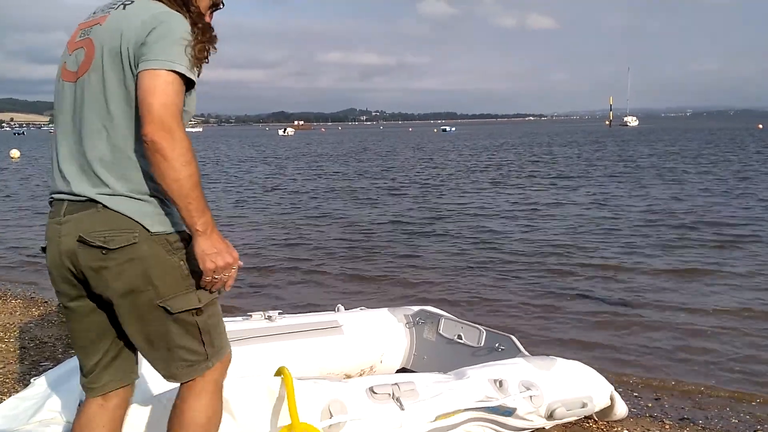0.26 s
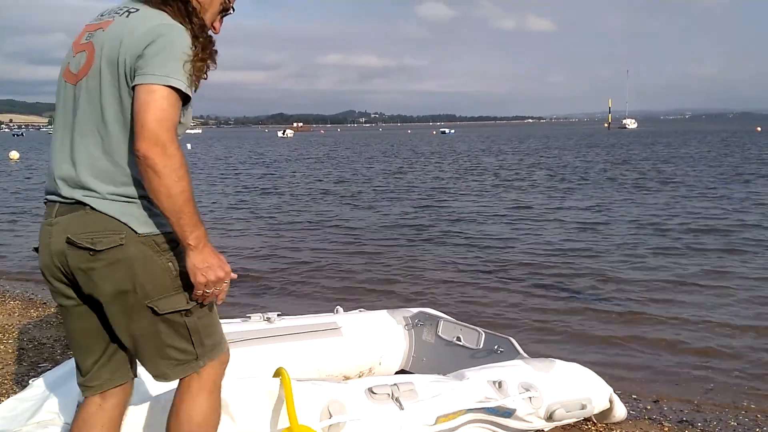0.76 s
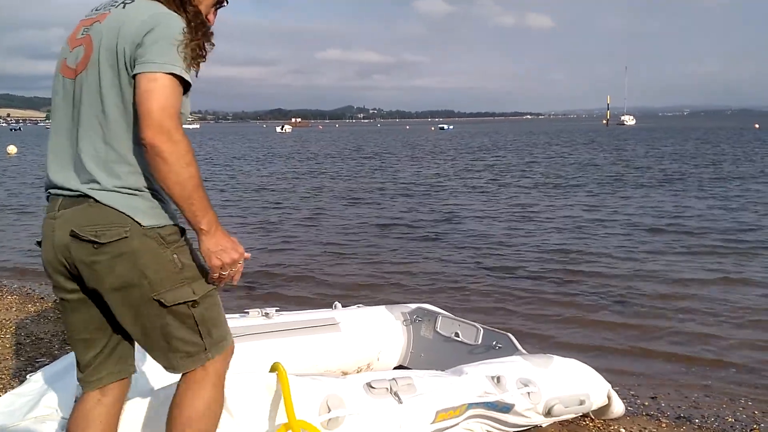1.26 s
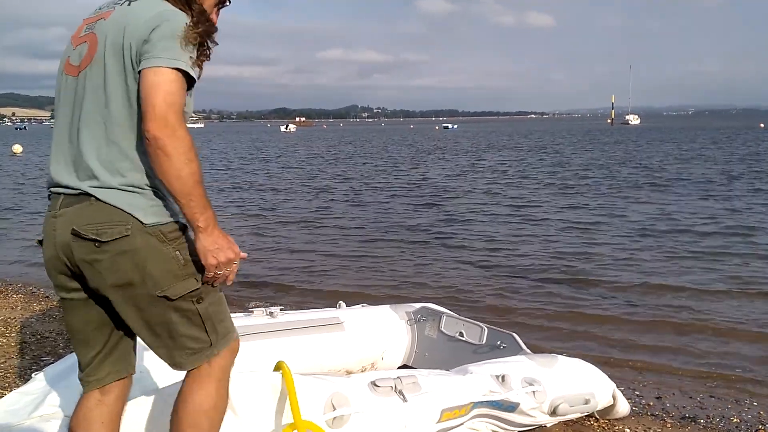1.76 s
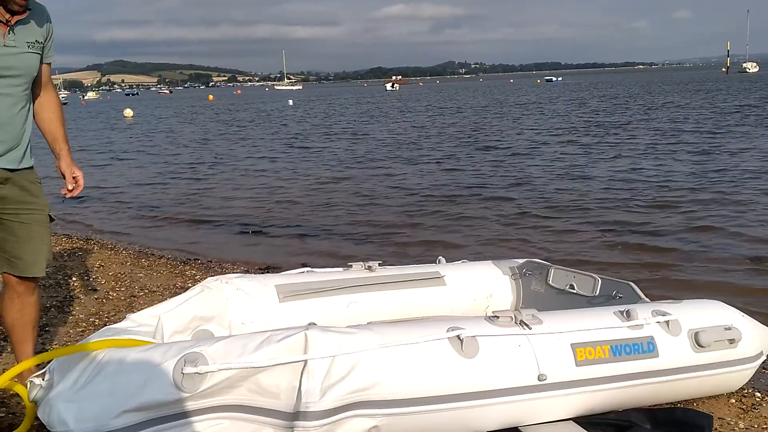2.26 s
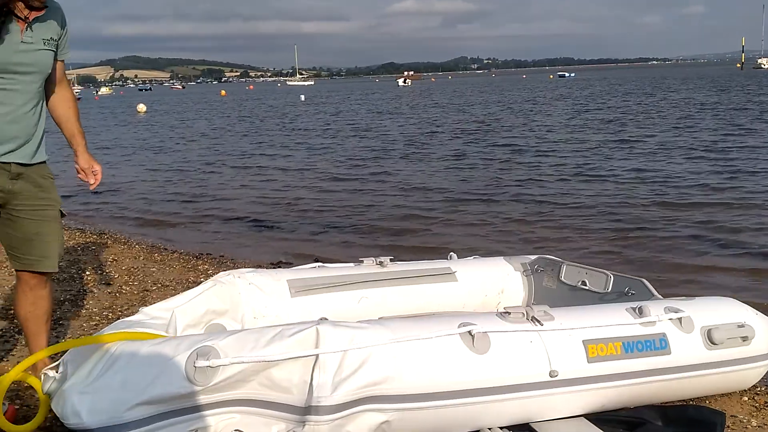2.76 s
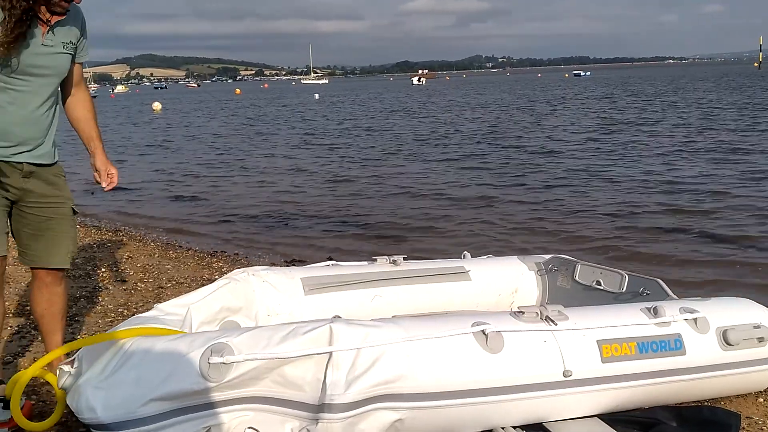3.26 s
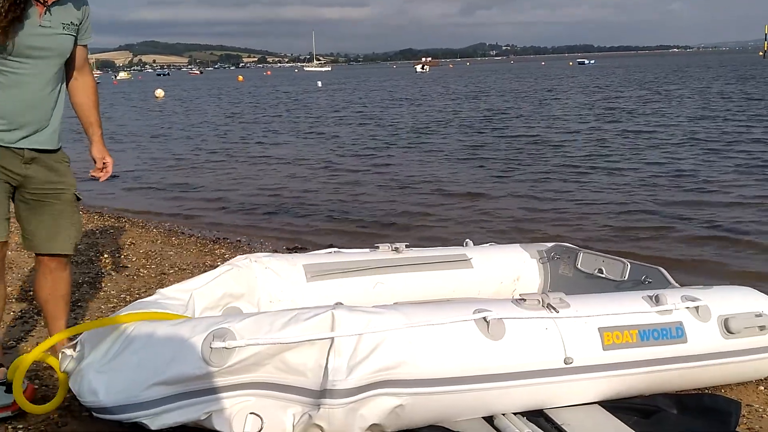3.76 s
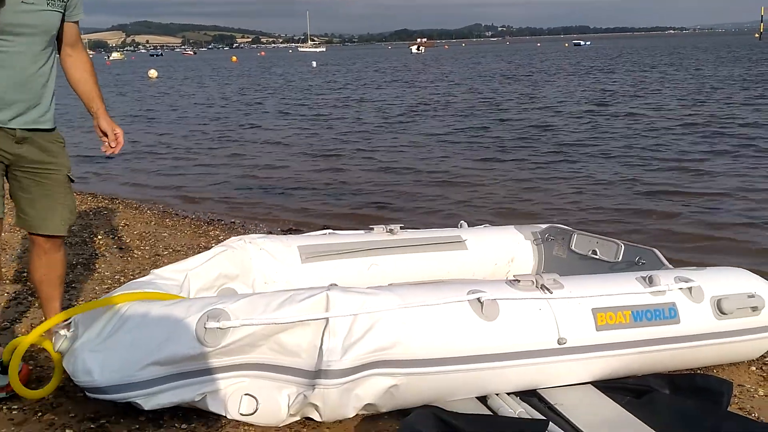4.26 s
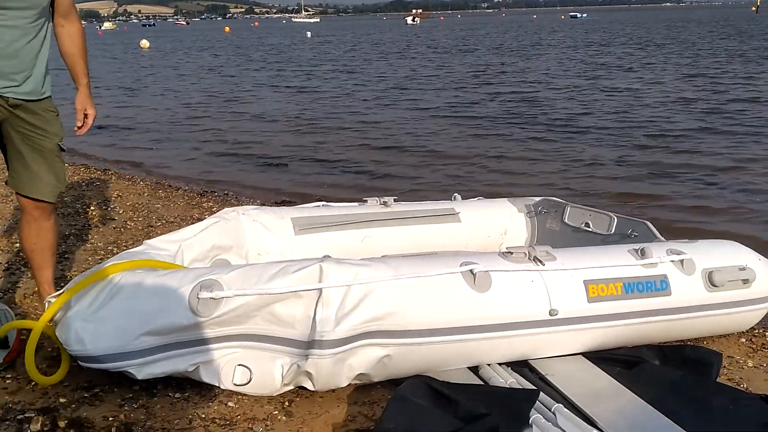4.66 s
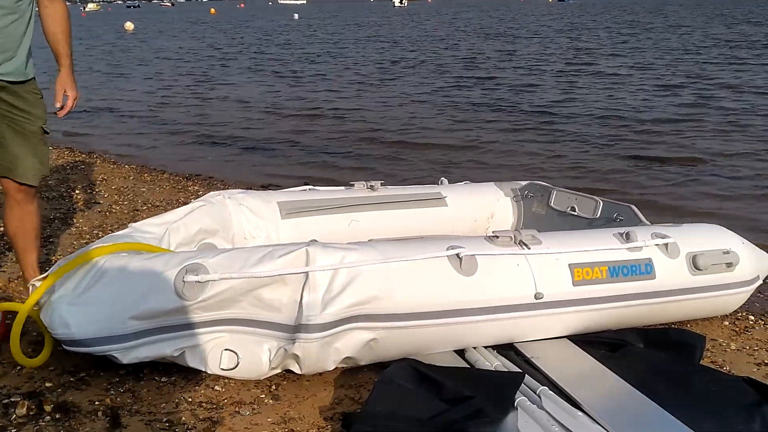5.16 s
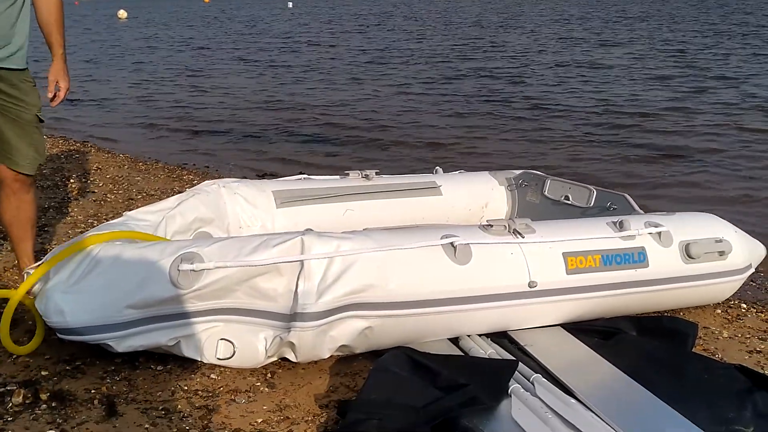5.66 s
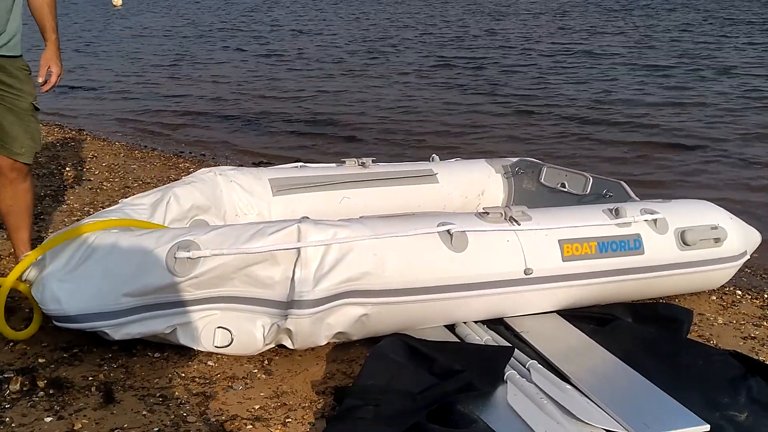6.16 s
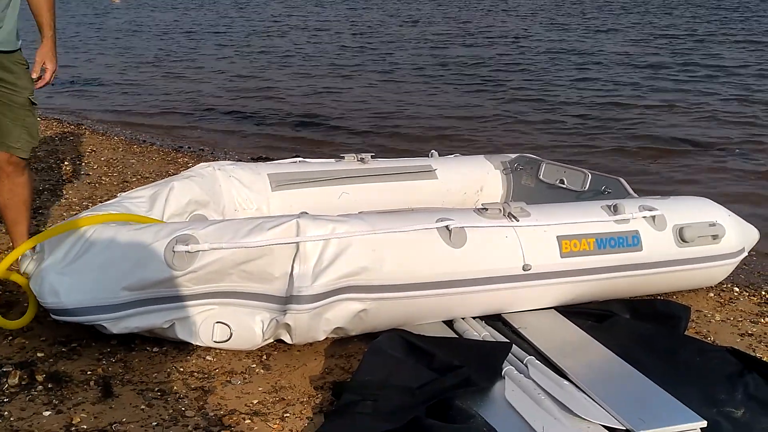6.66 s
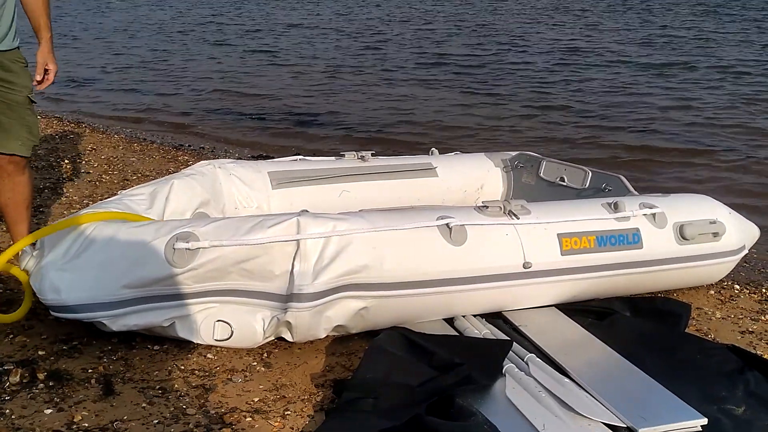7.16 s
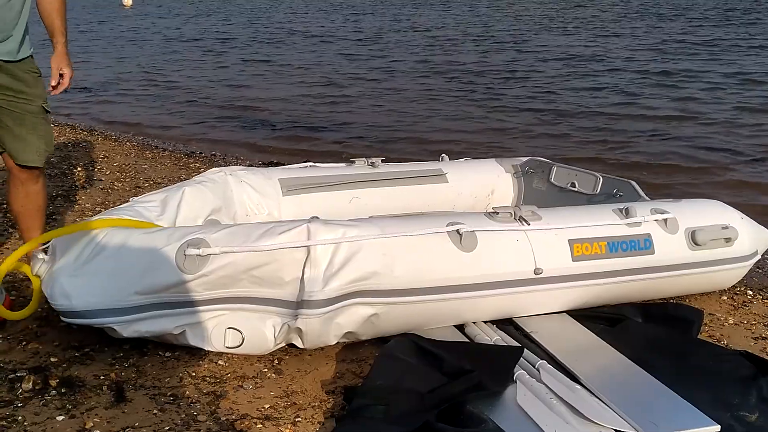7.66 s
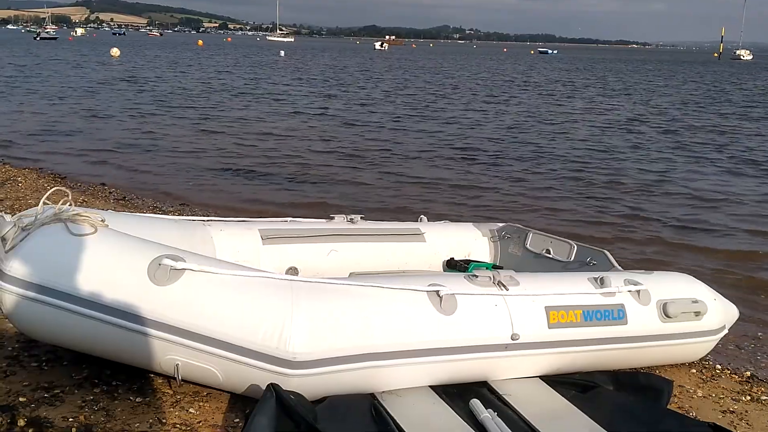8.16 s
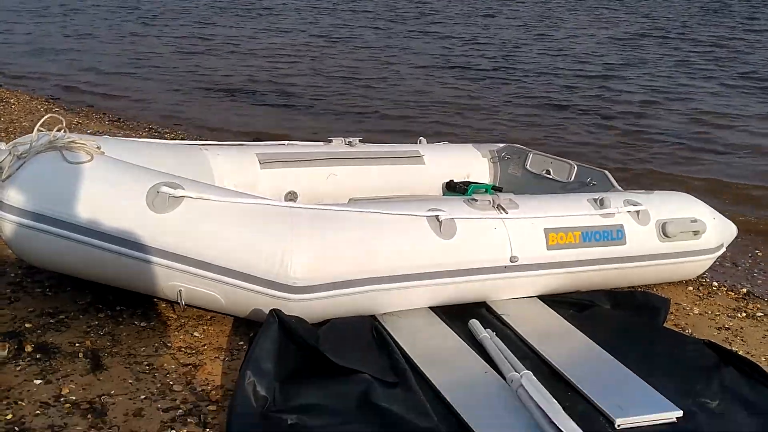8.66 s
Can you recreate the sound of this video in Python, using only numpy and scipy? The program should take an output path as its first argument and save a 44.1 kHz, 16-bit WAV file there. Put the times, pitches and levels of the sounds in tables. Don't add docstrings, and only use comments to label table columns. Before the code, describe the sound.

Rhythmic airy pushes with squeaky whistling tails and plastic clicks, two per second, under buffeting wind, ending in faint wash and gravel ticks.

```python
import sys
import numpy as np
from scipy import signal
from scipy.fft import rfft, irfft, next_fast_len
from scipy.io import wavfile
from scipy.ndimage import uniform_filter1d

SR = 44100
rng = np.random.default_rng(int(sys.argv[2]) if len(sys.argv) > 2 else 0)


def boost_factor(decibels):
    exponent = np.asarray(decibels, float) / 20
    return 10 ** exponent


def output_pcm(signal):
    pcm = np.clip(np.atleast_2d(signal).T, -1, 1) * 32767
    wavfile.write(sys.argv[1], SR, np.round(pcm).astype(np.int16))


N = 393606

# start t/s, cut t/s
TAKES = [
    (0.0, 2.1245),
    (2.469, 7.8445),
    (8.188, 8.9254),
]
HOSE_HZ = 101.78


def rms_one(x):
    return x / np.sqrt(np.mean(x ** 2) + 1e-20)


def coloured(spectrum):
    hz, level_db = np.transpose(spectrum)
    size = next_fast_len(N)
    grid = np.log(np.fft.rfftfreq(size, 1 / SR) + 1)
    gain = boost_factor(np.interp(grid, np.log(hz), level_db))
    return rms_one(irfft(rfft(rng.standard_normal(size)) * gain, size)[:N])


def drift(rate):
    r = np.exp(-16 * np.pi * rate / SR)
    slow = signal.lfilter([1], [1, -2 * r, r * r], rng.standard_normal(N // 8 + 4002))[4000:]
    return np.interp(np.arange(N) / 8, np.arange(len(slow)), rms_one(slow))


def ring(x, hz, t60):
    r, w = boost_factor(-60 / (t60 * SR)), 2 * np.pi * hz / SR
    return signal.lfilter([0, np.sin(w)], [1, -2 * r * np.cos(w), r * r], x)


def add(out, s, burst, pan_db):
    i = round(s * SR)
    sides = boost_factor(np.array([pan_db / 2, -pan_db / 2]))
    out[:, i:i + burst.shape[-1]] += (sides[:, None] * burst)[:, :N - i]


def knee(t, soft_s):
    return (np.hypot(t, soft_s) + t) / 2


def patchy(x, spread_db):
    hz, s, cells = signal.stft(x, nperseg=1024)
    field = rng.standard_normal(cells.shape[1:])
    field = uniform_filter1d(uniform_filter1d(field, size=6, axis=1), size=4, axis=0)
    gain = boost_factor(spread_db * rms_one(field) - spread_db ** 2 / 9)
    return signal.istft(cells * gain, nperseg=1024)[1][:, :N]


def push(t):
    hold_s, nozzle_fade_s, sing_s = 0.19, 0.17, 0.21
    landing = np.sin(np.pi / 2 * np.clip(t / 0.13, 0, 1)) ** 2
    jet = landing * boost_factor(-214.5 * knee(t - hold_s, 0.023))
    body = jet * boost_factor(-0.9 + 6.5 * np.clip((t - hold_s) / 0.028 + 0.062, 0, 1))
    nozzle = jet * boost_factor(1 - 75.5 * knee(t - nozzle_fade_s, 0.02))
    off_db = 133 * knee(sing_s - t, 0.012) + 217.5 * knee(t - sing_s, 0.013)
    return np.array([jet, body, nozzle, landing ** 0.7 * boost_factor(3.5 - off_db)])


def refill(t):
    sag_db = 80 * t + 455.5 * knee(t - 0.18, 0.013)
    puff_db = np.outer([0, 6], np.exp(-((t - 0.03) / 0.034) ** 2))
    return np.clip(t / 0.022, 0, 1) * boost_factor(1.0 - sag_db + puff_db)


def hiss_bands(spectrum, size, echo, take, valve=(1000, 100, 0), sings=False):
    # f/Hz, share
    likeness = [
        [(800, 0.24), (1300, 0.25), (1900, 0.39), (2700, 0.37), (3400, 0.33), (3800, 0.22), (4800, .35),
         (9000, .15)],
        [(800, 0.98), (1100, 0.54), (1900, 0.6), (2500, 0.51), (3500, 0.26), (4250, 0.11), (4900, 0.51),
         (5800, 0.19), (9000, 0.081)],
    ]
    # f/Hz, phase/rad
    port_turn = [
        [(800, -1.5), (1200, -1.1), (1550, -2.9), (1900, -6.2), (2900, -6.3), (3350, -4.9), (3700, -7),
         (4300, -6), (4650, -5.5), (5000, -8.4), (6700, -8), (16000, -20)],
        [(800, -2), (1100, -1), (1500, -1.2), (1900, -2.5), (2240, -4.6), (2580, -6.9), (2930, -8.8),
         (3270, -9.4), (4400, -9.6), (5000, -11.3), (5500, -13.5), (6200, -15.7), (16000, -40)],
    ]
    m = next_fast_len(size)
    hz = np.fft.rfftfreq(m, 1 / SR) + 1
    common, left, right = rng.standard_normal((3, len(hz))) + 1j * rng.standard_normal((3, len(hz)))
    alike = np.clip(np.interp(hz, *np.transpose(likeness[take])), 0, 1)
    late = np.exp(1j * np.interp(hz, *np.transpose(port_turn[take])))
    pair = np.sqrt(alike) * common * [late, late ** 0] + np.sqrt(1 - alike) * np.array([left, right])

    points, *sides_db = np.transpose(spectrum)
    colour_db = np.array([np.interp(np.log(hz), np.log(points), db) for db in sides_db])
    turn = -np.exp(-2j * np.pi * hz / HOSE_HZ)
    pair = pair * boost_factor(colour_db) / np.abs(1 - echo * turn)
    treble = (hz > 3500) & (hz < 10000)
    pair = pair * m / np.sqrt(np.sum(np.abs(pair[:, treble]) ** 2))
    valve_hz, half_width_hz, valve_db = valve
    pair = pair * boost_factor(valve_db / (1 + ((hz - valve_hz) / half_width_hz) ** 2))

    hose = 1 / (1 + (hz / 3600) ** 10) / (1 + (2250 / hz) ** 14)
    nozzle = (1 - hose) / (1 + ((hz - 4700) / 760) ** 6)
    shares = [1 - hose - nozzle, hose, nozzle]
    if sings:
        shares.append(np.exp(-((hz - 3200) / 330) ** 2) * 0.08 / np.abs(1 - 0.93 * turn))
    return [irfft(pair * share, m)[:, :size] for share in shares]


def bellows():
    # start t/s, push level/dB, length factor, refill delay/s, refill level/dB
    treads = [(-.33, -28.5, 1.23, 0.28, -42.5), (0.175, -31, 1.17, .31, -43.5),
              (.68, -31.5, 1.16, 0.3, -43.5), (1.19, -32.5, 1.16, .3, -44), (1.69, -31.5, 1.195, .31, -42),
              (2.08, -53.5, 0.81, 0.24, -31), (2.599, -29, 1.17, 0.31, -40.5),
              (3.122, -27, 1.187, 0.31, -40), (3.642, -27.5, 1.14, 0.31, -39),
              (4.158, -28, 1.17, 0.31, -39), (4.683, -27, 1.166, 0.32, -39),
              (5.217, -27.5, 1.204, 0.32, -38.5), (5.739, -27, 1.167, 0.32, -38.5),
              (6.27, -27, 1.19, 0.32, -39), (6.802, -26.5, 1.19, .323, -38),
              (7.339, -26.5, 1.087, 0.34, -43)]
    # f/Hz, left level/dB per Hz, right level/dB per Hz
    pushed = [(898, -19, -26.5), (1530, -26, -12), (1840, -10, -5), (2125, -13, -9.5), (3040, -1.5, 3),
              (3430, -9.5, -0.5), (4500, -2, -2.5), (5030, -5, -7), (6000, -18, -11), (6910, -2, -16),
              (9150, -14, -6), (12700, -27.5, -31.5), (14540, -35.5, -53), (15340, -40.5, -46)], [(449, -24, -48), (876, -19, -23.5), (990, -23, -10.5), (1725, -6.5, -12.5),
                            (2307, -8.5, -9), (2953, 4, -1.5), (4120, -8, -2.5), (4940, -5.5, -10),
                            (5700, -13.5, -12), (7510, -10.5, -13.5), (9520, -22, -7.5),
                            (10140, -36, -17.5), (13200, -35, -31.5), (15440, -47.5, -44)]
    drawn = [(893, -28, -32), (1487, -15.5, -7), (2210, -17, -10.5), (2440, -5, -0.5), (3250, -13.5, -9.5),
             (4260, -13, -11.5), (6250, -21.5, -24), (6560, -16.5, -8), (6670, -13, -21), (9300, -30, -23),
             (15240, -46.5, -53.5)], [(450, -32, -69), (917, -15, -9), (1440, -25.5, -16.5), (1533, -3, -11.5),
                                (1820, -20.5, -15.5), (2900, -3.5, -7.5), (4460, -16, -12.5),
                                (5060, -12.5, -19), (8540, -25, -20.5), (9460, -42, -17),
                                (11700, -38.5, -36.5), (15460, -52.5, -43)]
    # f/Hz, half width/Hz, level/dB
    chamber = [
        (1118, 120, 17),
        (2540, 90, 6),
    ]
    t = np.arange(N) / SR
    blow, draw = np.zeros((4, N)), np.zeros((2, N))
    for s, push_db, stretch, back_s, back_db in treads:
        on = slice(max(round(s * SR), 0), round((s + 0.55) * SR))
        blow[:, on] += boost_factor(push_db) * push((t[on] - s) / stretch)
        draw[:, on] += boost_factor(back_db) * refill(t[on] - s - back_s)
    jet_flicker, body_flicker, sing_flicker = 1.0 * drift(19), 1.8 * drift(36), 2.0 * drift(25)
    blow = blow * boost_factor(np.array([jet_flicker, body_flicker, jet_flicker, sing_flicker]))
    draw = draw * boost_factor(0.72 * drift(29))

    out = np.zeros((2, N))
    for take in range(2):
        start, cut = TAKES[take]
        on = slice(round(start * SR), round(cut * SR))
        size = on.stop - on.start
        bands = hiss_bands(pushed[take], size, 0.36, take, chamber[take], sings=True)
        out[:, on] += sum(gain[on] * band for gain, band in zip(blow, bands))
        jet, body, nozzle = hiss_bands(drawn[take], size, 0.15, take, chamber[take])
        out[:, on] += draw[0, on] * (jet + body) + draw[1, on] * nozzle
    return patchy(out, 2)


def shore():
    # f/Hz, left level/dB per Hz, right level/dB per Hz
    wash = [(352, -15, -17.5), (570, 0, 4.5), (2460, -2.5, -3), (4800, -14.5, -9), (8440, -17, -20),
            (10030, -29.5, -20), (12680, -38.5, -39), (15300, -50, -46)]
    level_db = -61.5
    lapping = drift(8.5)
    broad, rustle, fizz = hiss_bands(wash, N, 0, take=0)
    steady = boost_factor(level_db + 1.4 * lapping) * (broad + fizz)
    return patchy(steady + boost_factor(level_db + 3.0 * lapping[::-1]) * rustle, 4)


def gust_levels():
    # t/s, left level/dB, right level/dB
    slow = [(0, -21.5, -21), (2.12, -19, -18.5), (2.6, -22, -26.5), (2.8, -31, -32.5), (3.86, -25, -27),
            (4.08, -25.5, -19.5), (4.3, -29.5, -29), (5.15, -26, -14.5), (5.4, -31, -18.5),
            (5.65, -29, -14), (6.07, -30.5, -22.5), (6.9, -23.5, -19), (7.18, -28, -16),
            (7.45, -28.5, -22.5), (7.72, -30.5, -14.5), (8.25, -30.5, -40), (8.56, -39, -24),
            (8.92, -44, -33)]
    # t/s, half width/s, left level/dB, right level/dB
    gusts = [(.1, 0.038, 2.5, 4.5), (.4, 0.024, 5, 2.5), (0.619, 0.0091, -12, 10), (.73, 0.048, 4, -1.5),
             (0.829, 0.021, -10, 1), (.965, .025, 5, -3), (1.1, 0.08, -2, 2.5), (1.19, 0.031, 2.5, -2),
             (1.32, 0.018, -11.5, -1.5), (1.44, 0.018, 5, -6), (1.62, 0.029, -6.5, -1.5),
             (1.755, 0.011, -11, 2.5), (1.87, 0.0093, 3, -3), (1.98, 0.03, 5.5, 1), (.065, 0.02, -0.5, -3),
             (3.05, 0.036, -2.5, -6.5), (3.57, 0.018, -6, 2), (3.89, 0.17, -9, -3.5), (4.13, 0.025, 0, 4.5),
             (4.26, 0.074, -1.5, -4.5), (4.62, 0.064, -1.5, -5.5), (5.05, 0.045, 1, 1.5),
             (5.2, 0.064, 9.5, -3), (5.35, 0.04, 2.5, -6), (5.58, 0.036, 0, 2), (5.9, 0.074, -7, -1.5),
             (6.19, 0.03, 0, 0.5), (6.279, 0.024, 12, 6), (6.52, 0.047, -5, 4), (6.58, 0.037, 0, -2.5),
             (6.91, 0.044, 4, 2.5), (7.06, 0.028, -3, -1), (7.16, 0.07, 6.5, 4.5), (7.27, 0.055, -1, -0.5),
             (7.44, 0.055, 3.5, 2.5), (7.54, 0.034, -6, 0), (7.819, 0.035, 4.5, -1.5),
             (8.65, 0.047, 4.5, 5.5), (8.73, 0.031, -9, 10.5), (8.83, 0.024, 2, -11)]
    s, *sides = np.transpose(slow)
    port_db = np.array([np.interp(np.arange(N) / SR, s, side) for side in sides])
    for s, width, *sides_db in gusts:
        t = np.arange(-3 * width, 3 * width, 1 / SR)
        i = max(round((s + t[0]) * SR), 0)
        bump_db = np.array(sides_db)[:, None] * np.exp(-(t / width) ** 2)
        port_db[:, i:i + len(t)] += bump_db[:, :N - i]
    return port_db


def wind():
    # f/Hz, level/dB per Hz
    rumble_colour = [(12, -5.5), (25, 5), (45, 6.5), (90, 0.5), (160, -8), (300, -25.5), (700, -101)]
    # f/Hz, level/dB per Hz
    eddy_colour = [(40, -28.5), (110, -2.5), (180, -1.5), (280, -6.5), (450, -19.5), (800, -39),
                   (1500, -96.5)]
    sweep = [(1.35, .5, 0.96, 0.3478), (1.1, .3, .8, .3), (1.5, 0.288, 0.72, 0.218)]
    # left level/dB, right level/dB, slope/dB per dB of gust
    buffeting = [(-22, -24.5, 1.5), (-29.5, -28, 1.15), (-44.5, -33, 0.6)]
    rumble_db, calm_db = [3, 1.5], -20
    port_db = gust_levels()
    take = np.searchsorted([cut for start, cut in TAKES[:2]], np.arange(N) / SR)
    speeds, levels = np.array(sweep)[take], np.array(buffeting)[take]
    low_pass = signal.butter(4, 1800, fs=SR, output="sos")
    out = np.zeros((2, N))
    for k in range(2):
        mean, gusty = speeds[:, 2 * k:2 * k + 2].T
        waver = np.tanh(0.55 * drift(54.67) + 0.35 * drift(9))
        place = np.cumsum(mean * np.exp(gusty * waver)) % (N - 1)
        eddies = signal.sosfilt(low_pass, np.interp(place, np.arange(N), coloured(eddy_colour)))
        buffet_db = levels[:, k] + levels[:, 2] * (port_db[k] - calm_db) + 7.1 * waver
        roar_db = port_db[k] + rumble_db[k] + 2.1 * drift(19) + 2.0 * waver
        out[k] = boost_factor(roar_db) * coloured(rumble_colour) + boost_factor(buffet_db) * eddies
    return out


def eddy_hits():
    # t/s, peak level/dB, left-right level/dB, f/Hz
    lumps = [
        (1.287, -5, 20.5, 50),
        (5.027, -7.5, 0.5, 46.5),
        (7.635, -8, -4, 60),
        (7.68, -8, -4, 70),
        (7.73, -7, -6, 55),
        (6.9, -6, 10, 51),
        (1.786, -9, 20, 80),
        (1.935, -10, 20, 50),
        (2.107, -10, 20, 120),
    ]
    pops = [(0.06, -30, 24, 576), (.019, -19, 1, 450), (.166, -16, 6, 450), (.341, -26, 15, 450),
            (.36, -16, 24.5, 610), (.383, -17, 13.5, 477), (.461, -27, 16, 400), (.504, -22, 17, 400),
            (.882, -27, 12, 400), (.966, -12, 30.5, 580), (1.082, -23, 21, 420), (1.121, -23, 21, 490),
            (1.497, -14.5, 14, 400), (1.651, -17, 12, 450), (1.68, -24, 4, 650), (1.843, -8.5, 15.5, 500),
            (1.985, -10.5, 28, 560), (2.035, -16, 12, 545), (2.091, -25, 7, 478), (0.412, -20.5, 29, 601),
            (0.575, -11.5, 19, 413), (0.642, -22, 16, 635), (0.684, -4.5, 1, 450), (0.708, -21, 24, 570),
            (0.744, -12, 19, 650), (0.956, -12, 32, 566), (1.004, -13.5, 34.5, 500), (1.167, -29, 10, 501),
            (1.185, -12, 30, 744), (1.349, -14.5, 25.5, 544), (1.435, -18.5, 39, 526),
            (1.46, -14.5, 28, 520), (1.562, -13.5, 23, 543), (1.216, -12, 10, 550), (1.27, -20.5, 25, 520),
            (1.716, -14, 19.5, 610), (1.739, -11, 23.5, 550), (1.774, -10, 25.5, 553),
            (1.796, -14, 22.5, 700), (1.82, -9, 26, 506), (1.883, -11.5, 27.5, 501),
            (1.919, -10.5, 28, 520), (1.971, -16.5, 33.5, 610)] + [(4.443, -25, 15, 296), (5.062, -33, -4.5, 300), (5.097, -16, -14.5, 298),
                           (5.124, -23, -11, 300), (5.65, -30, -9, 299), (5.921, -32, -10.5, 298),
                           (6.364, -26.5, -8.5, 299), (6.749, -35, -5.0, 300), (6.9, -30, 8, 298),
                           (6.957, -13.5, 6.5, 296), (7.001, -39, -10, 300), (7.029, -40, -13, 297),
                           (7.091, -21, -18, 299), (7.122, -19.5, -24, 293), (7.161, -24, -12.5, 300),
                           (7.179, -20, -9.5, 298), (7.627, -28, -6.5, 300), (7.676, -19, -22, 302),
                           (7.725, -13.5, -16, 306)]
    flaps = []
    for s, db, pan_db, hz in pops:
        for n in (1, 2, 3):
            late = rng.random()
            gap_s = 0.005 * n * (0.589 + 0.5 * late)
            flaps.append((s + gap_s, db - 11 - 4 * n * late, pan_db, hz * (1.2 - 0.56 * late)))
    out = np.zeros((2, N))
    for hits, turn, edge in [(lumps, 0, 2), (pops + flaps, -0.61, 1.7)]:
        for s, peak_db, pan_db, hz in hits:
            t = np.arange(-2 / hz, 2 / hz, 1 / SR)
            pulse = np.sin(2 * np.pi * hz * t + turn) * np.exp(-np.abs(1.89 * hz * t) ** edge)
            add(out, s + 0.0011 - 2 / hz, boost_factor(peak_db - 5.0) * pulse, pan_db)
    return out


def pedal():
    # t/s, click peak level/dB, thump level/dB, left-right level/dB
    snaps = [(0.179, -25.5, -47, -6), (0.21, -40.5, -39, -4.5), (0.6774, -31, -39, 4),
             (0.7046, -42, -20, 11), (1.17, -38, -16, -11), (1.184, -33.5, -10.5, -6),
             (1.68, -29, -21, -16), (1.6903, -33, -17, 1.5), (2.5521, -48, -38, -2.5), (2.572, -59, -17, 3),
             (2.588, -29, -25, 3), (3.069, -60, -28.5, 0), (3.601, -60, -28, 0), (4.143, -34, -24, 0),
             (4.635, -60, -25, 0), (5.203, -37, -32, 0.5), (5.728, -40, -24, 0), (2.599, -28.5, -23, 11.5),
             (3.113, -38.5, -26.5, -4), (3.1214, -29.5, -17, 10), (3.633, -33.5, -21, 2.5),
             (3.6429, -24.5, -19, 11.5), (4.1534, -30.5, -19, 5.5), (4.674, -29, -21.5, -2.5),
             (4.685, -26.5, -19.5, 13), (5.213, -27.5, -19.5, 13.5), (5.739, -29.5, -17.5, 8),
             (6.257, -33, -24, 4), (6.2699, -25.5, -23, 9), (6.788, -26, -21.5, 8),
             (6.801, -26.5, -19.5, -9), (7.323, -28, -33, 3), (7.3362, -27.5, -21, 12)]
    # f/Hz, level/dB, t60/s
    plastic = [(1520, -13.5, 0.0046), (2840, -5.5, 0.0027), (4173, 5, 0.00084), (5460, -1, 0.002),
               (8500, -8.5, 0.0022)]
    out, tick = np.zeros((2, N)), signal.unit_impulse(3000)
    rise = np.arange(3000) / (0.0014 * SR)
    bounced = tick - 0.42 * np.roll(tick, round(0.021 * SR))
    soft = signal.lfilter([0.05], [1, -0.95], bounced)
    thump = ring(ring(soft, 173, 0.016), 379, 0.016) / 25 + 0.18 * ring(soft, 480, 0.035)
    for s, click_db, thump_db, pan_db in snaps:
        crack = uniform_filter1d(rng.standard_normal(3000), size=3) * rise * np.exp(-rise)
        is_valve = any(0 < later[0] - s < 0.034 for later in snaps)
        click = np.zeros(3000)
        for hz, db, t60 in plastic:
            mode_db = db + rng.normal(0, 2.7) - 10.5 * is_valve * np.log2(hz / 2000)
            click += boost_factor(mode_db) * ring(crack, hz, t60)
        add(out, s, boost_factor(click_db - 4.5) * click / np.abs(click).max(), pan_db)
        add(out, s, boost_factor(thump_db + 11.5) * thump, 1.0)
    return out


def whistles():
    # peak t/s, mode number, rms level/dB, fall/s
    tones = [(.408, 33, -26.5, .032), (0.438, 29, -31, 0.012), (.465, 30, -38, 0.018),
             (.875, 34, -31.5, 0.036), (.909, 33, -27.5, 0.027), (0.926, 31, -31.5, .022),
             (.925, 29, -34.5, 0.014), (.935, 30, -38.5, 0.027), (1.414, 33, -31.5, 0.043),
             (1.44, 30, -38, .018), (1.455, 28, -37.5, 0.023), (1.926, 33, -23.5, 0.011),
             (1.935, 32, -28.5, .018), (2.829, 33, -19, 0.017), (2.839, 32, -25, .015),
             (2.845, 31, -22, 0.013), (3.365, 33, -21.5, 0.017), (3.37, 32, -20, .016),
             (3.886, 33, -23, 0.014), (3.91, 31, -30, 0.023), (4.39, 34, -21.5, 0.014),
             (4.394, 33, -25.5, .024), (4.41, 30, -30, .02), (4.411, 29, -19.5, 0.019),
             (4.928, 33, -21, 0.018), (4.94, 30, -19.5, 0.02), (5.46, 32, -22.5, .04),
             (5.469, 33, -21.5, 0.017), (5.482, 30, -26, 0.016), (5.97, 33, -31, 0.059),
             (6.004, 30, -20.5, .022), (6.5, 34, -23.5, .017), (6.518, 32, -15.5, 0.0205),
             (6.53, 29, -23.5, 0.021), (7.029, 34, -23, .017), (7.059, 31, -29.5, 0.0258),
             (7.07, 27, -37, 0.018), (7.094, 33, -31.5, 0.041), (7.575, 34, -29, .016),
             (7.59, 31, -21.5, 0.0095), (7.592, 29, -26, .014)]
    # f/Hz, left-right level/dB
    balance = [
        [(3000, -6.5), (3450, -14.5)],
        [(3000, 2), (3450, 0)],
    ]
    lead = [1.1, -2.15]
    rise_s, ring_db, ring_s = 0.019, -17.5, 0.054
    sag, detune = 0.003, 0.007
    uppers = [(s - 0.018, mode + 1, db - 14, fall) for s, mode, db, fall in tones]
    lowers = [(s + 0.013, mode - 1, db - 14, fall) for s, mode, db, fall in tones]
    out, t = np.zeros((2, N)), np.arange(-0.08, 0.17, 1 / SR)
    unsteady = boost_factor(2.6 * drift(18))
    tail = boost_factor(ring_db) * np.exp(-(t / np.where(t < 0, 0.32 * ring_s, ring_s)) ** 2)
    for k, (s, mode, level_db, fall) in enumerate(tones + uppers + lowers):
        hz = (round(mode) + 0.5) * HOSE_HZ
        take = int(s > TAKES[1][0])
        pan_db = np.interp(hz, *np.transpose(balance[take]))
        shift = lead[take] + 0.62 * rng.standard_normal()
        fall_db = -8 * np.hypot(t / fall, 0.6) + 4.26 - 600 * t ** 2
        swell = boost_factor(np.where(t < 0, -8 * (t / rise_s) ** 2, fall_db)) + tail
        flutter = unsteady[8000 * k % (N - len(t)):][:len(t)]
        pull = sag * (np.tanh(-t / 0.014) + 0.4) + detune * np.log(flutter[0])
        turns = np.cumsum(hz * (1 + pull)) / SR + 0.38 * k
        tone = np.sin(2 * np.pi * turns + [[shift], [0]])
        add(out, s + t[0], boost_factor(level_db + 3.5) * swell * flutter * tone, pan_db)
    return out


def gravel():
    # t/s, peak level/dB, f/Hz
    stones = [(8.248, -41, 2700), (8.3, -55, 6470), (8.4546, -57, 2600), (8.492, -65, 8500),
              (8.519, -61, 2750), (8.591, -54.5, 4000), (8.689, -44, 4500), (8.6985, -33.5, 3560),
              (8.708, -39, 3500), (8.64, -55, 8300), (8.833, -47, 5500), (8.8734, -53.5, 3500),
              (8.895, -54, 3500)]
    out = np.zeros((2, N))
    for s, peak_db, hz in stones:
        band = signal.butter(2, [1.05 * hz, min(2.4 * hz, 10000)], "band", fs=SR, output="sos")
        crack = signal.sosfilt(band, rng.standard_normal(1500)) * np.exp(-np.arange(1500) / (0.004 * SR))
        tick = crack + ring(crack, hz, 0.0056) * 0.2
        add(out, s, boost_factor(peak_db - 1.0) * tick / np.abs(tick).max(), -4.0)
    plop = ring(np.pad(np.hanning(90) / 18, (0, 2500)), hz=690, t60=0.05)
    add(out, 8.886, boost_factor(-34.5) * plop, 0.0)
    return out


def scene():
    return bellows() + shore() + wind() + eddy_hits() + pedal() + whistles() + gravel()


def top_cut(x):
    return signal.sosfilt(signal.butter(12, 15590, fs=SR, output="sos"), x)


def record(dry):
    fade_in = [0.0013, 0.2, 0.25]
    cut_at, bend_s = [-0.075, 0.008, 0.035], 0.004
    t = np.arange(N) / SR
    on = sum(np.clip((t - start) / rise, 0, 1) * (t < cut) for (start, cut), rise in zip(TAKES, fade_in))
    taken = np.tanh(dry * 1.167) * 1.04
    for (start, cut), level in zip(TAKES, cut_at):
        last = taken[:, min(int(cut * SR), N - 1), None]
        taken = taken + (level - last) * np.exp(-((t - cut) / bend_s) ** 2)
    return top_cut(on * taken)


dry = scene()
out = record(dry)
output_pcm(out)
```